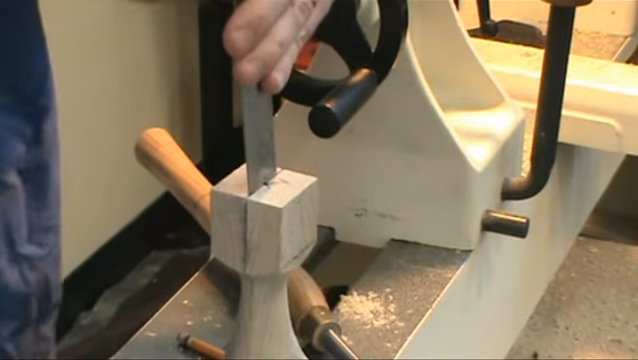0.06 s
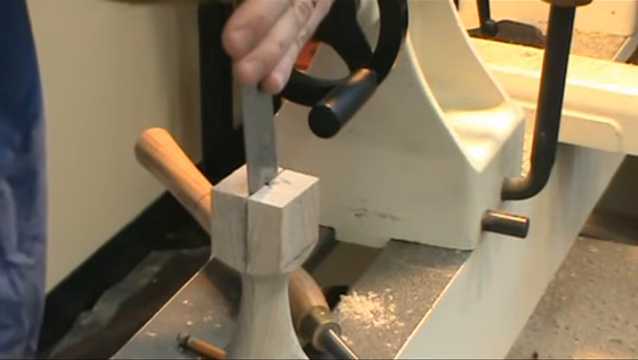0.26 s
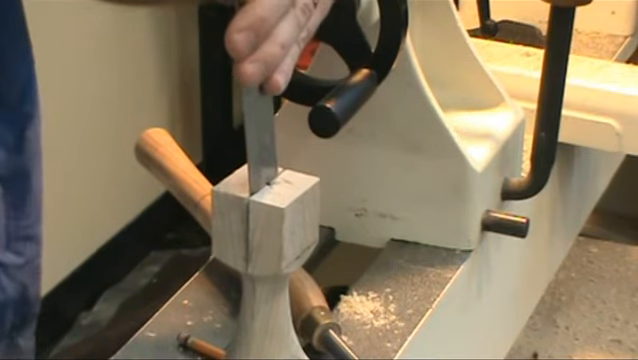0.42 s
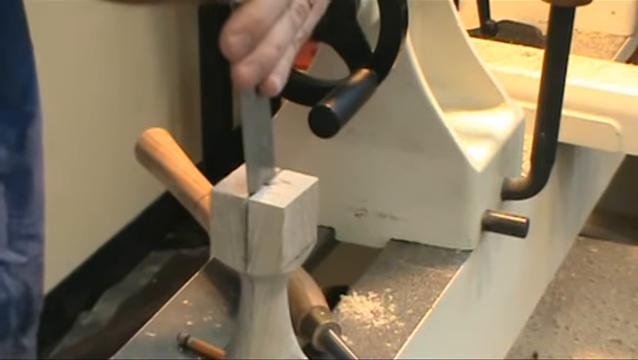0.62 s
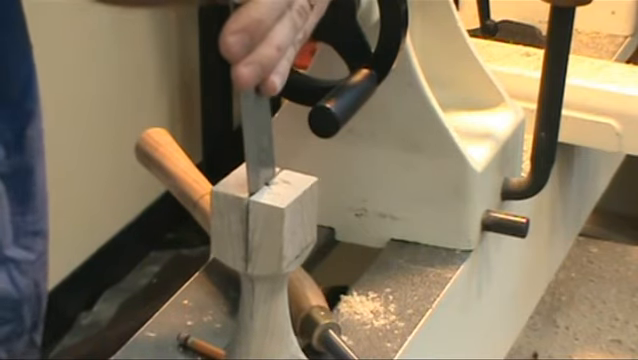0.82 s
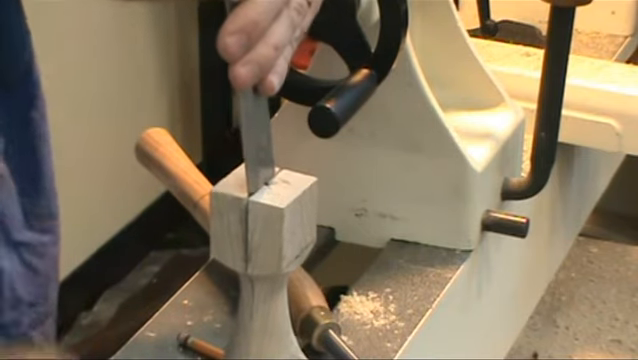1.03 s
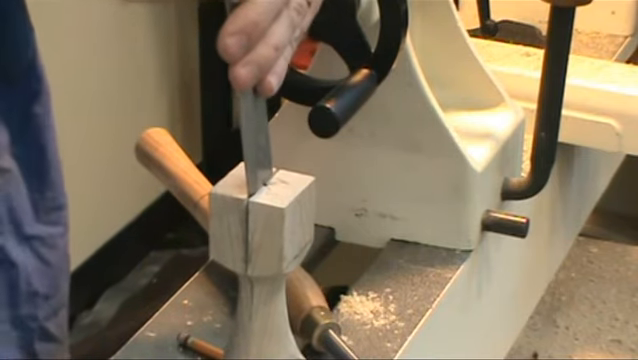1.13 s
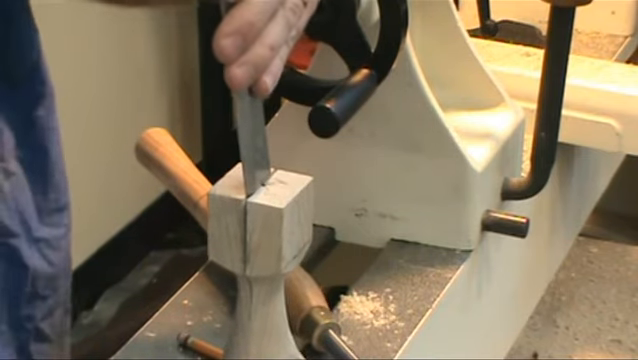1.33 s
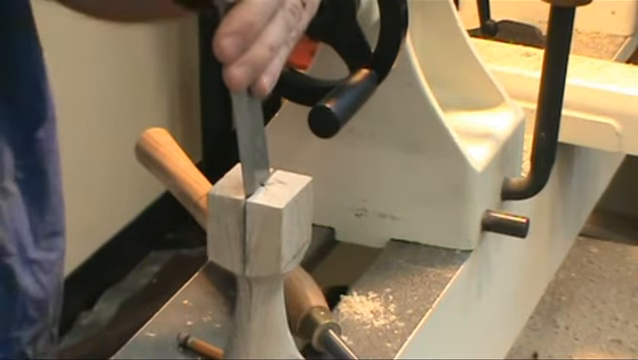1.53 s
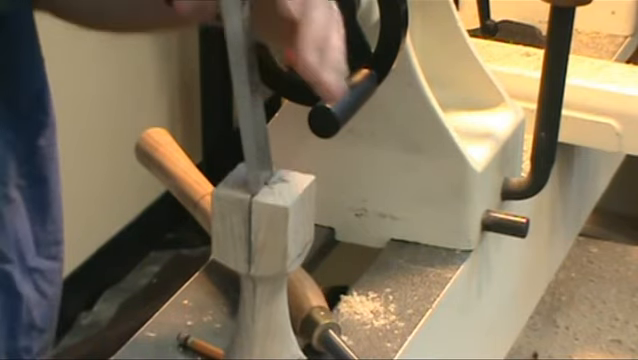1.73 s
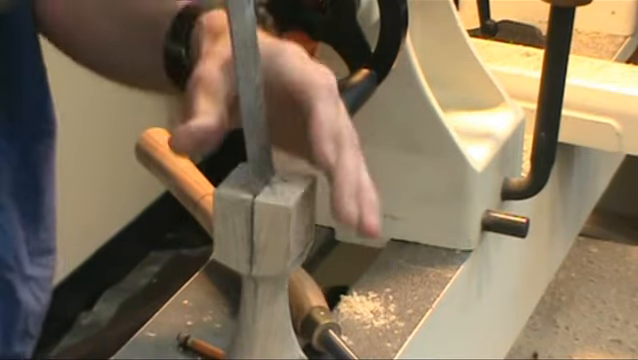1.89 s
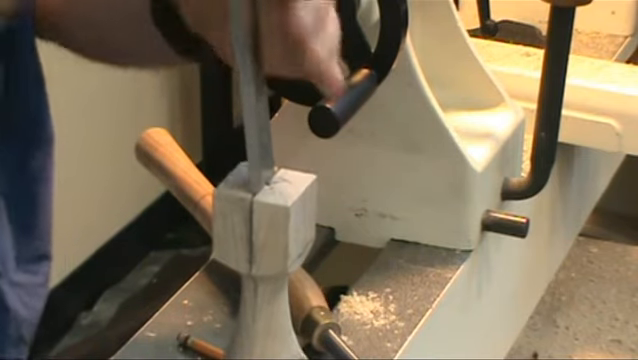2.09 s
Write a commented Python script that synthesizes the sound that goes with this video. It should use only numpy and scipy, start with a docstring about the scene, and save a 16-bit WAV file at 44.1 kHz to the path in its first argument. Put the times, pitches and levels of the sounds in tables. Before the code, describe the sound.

Three sharp wooden knocks on a chisel ring through a large, hard, echoing workshop

```python
"""Room rumble, hum, hiss and a thin high whine run throughout a large hard workshop, with the fading tail of an
earlier sound at first. A chisel standing in a glued wooden block on a steel lathe bed then takes three quick blows:
each is a noise crack, a dead thunk and damped modes of block and bed, followed by a wall's slap and the hall's tail.
Afterwards a tool is put down (damped partials), a sleeve rustles (noise puffs) and something squeaks faintly
(gliding tones); automatic gain control lowers the loud moments and recovers slowly."""
import sys
import numpy as np
from scipy import signal
from scipy.fft import rfft, irfft, next_fast_len
from scipy.io import wavfile
from scipy.ndimage import uniform_filter1d

SR = 44100
rng = np.random.default_rng(int(sys.argv[2]) if len(sys.argv) > 2 else 0)


def nominal_scale(level):
    """Amplitude ratio for a level in decibels (scalar or array-like)."""
    x = np.asarray(level, float) / 20
    return 10 ** x


def transcribe(u):
    """Save the signal u as a 16-bit wav file named by the first command-line argument.

    u: samples, shape (n,) or (channels, n), limited to [-1, 1]; the rate is SR.
    q: integer samples, one column per channel.
    """
    v = np.clip(np.atleast_2d(u).T, -1, 1)
    q = np.round(v * 32767).astype(np.int16)
    wavfile.write(sys.argv[1], SR, q)


N = 94815  # samples in the scene
HALF_SECOND = np.arange(SR // 2) / SR  # time axis of one short sound, s


def unit(x):
    """Normalisation: scales a signal to rms 1."""
    return x / np.sqrt(np.mean(x ** 2) + 1e-20)


def along(points, hz):
    """Logarithmic frequency scale: interpolates (Hz, value) points."""
    f, v = np.transpose(points)
    return np.interp(np.log(hz + 1), np.log(f + 1), v)


def bell(f, hz, octaves):
    """Constant relative bandwidth: a Gaussian hump on a log frequency axis."""
    return np.exp(-.5 * (np.log2((f + 1) / hz) / octaves) ** 2)


def coloured(shape, gain):
    """Spectral shaping: white noise weighted by gain(f), then scaled to rms 1."""
    m = next_fast_len(shape[-1])
    spectrum = rfft(rng.standard_normal(shape), m) * gain(np.fft.rfftfreq(m, 1 / SR))
    return unit(irfft(spectrum, m)[..., :shape[-1]])


def phase_walk(shape, width_hz):
    """Phase diffusion: a random walk in phase widens a spectral line to width_hz."""
    return np.cumsum(rng.standard_normal(shape), axis=-1) * np.sqrt(2 * np.pi * width_hz / SR)


def spread(pair, alike):
    """Interaural coherence: mid and side from two unrelated signals give the likeness per frequency."""
    n = pair.shape[-1]
    angle = np.arccos(np.clip(along(alike, np.fft.rfftfreq(n, 1 / SR)), 0, 1)) / 2
    mid, side = irfft(rfft(pair) * [np.cos(angle), np.sin(angle)], n)
    return np.array([mid + side, mid - side])


def add(track, s, x):
    """Superposition: mixes x into track from time s."""
    part = track[..., round(s * SR):][..., :x.shape[-1]]
    part += x[..., :part.shape[-1]]


# spectrum of the crack at the second blow: frequency_hz, relative_db
CRACK = [(300, -38), (1000, -16.5), (2500, -0.5), (5000, -4.5), (7000, -7), (9800, -5), (12500, -10.5),
         (15500, -42), (17000, -64)]
BRIGHTENS_DB = 1.5  # treble tilt per blow, nearing this much per octave above 5 kHz: the chisel bites harder


def bite(f, k):
    """Impact spectrum: a harder contact is shorter and so brighter; gives dB at f for blow k."""
    return along(CRACK, f) + BRIGHTENS_DB * (k - 1) * np.log2(1 + f / 5000)


def crack(k, crack_db):
    """Impact noise: a broadband burst, held briefly, then decaying exponentially."""
    t, hold_s, t60_s, rise_s = HALF_SECOND, 0.0019, 0.015, 0.0013
    burst = coloured(t.shape, lambda f: nominal_scale(bite(f, k)))
    decay = nominal_scale(crack_db - 5 - 60 * np.maximum(t - hold_s, 0) / t60_s)
    return burst * decay * np.minimum(t / rise_s, 1)


# spectrum of dead wood: frequency_hz, relative_db
THUNK = [(80, -45), (200, -19.5), (450, -4.5), (750, -8), (1500, -1.5), (2200, -10), (3000, -7),
         (4500, -16), (9000, -31), (15000, -56)]


def thunk(ring_colour, mean_db):
    """High damping: dead wood answers with a noise burst that has no clear pitch."""
    t, level_db, t60_s, rise_s = HALF_SECOND, -14.5, .12, 0.00075
    burst = coloured(t.shape, lambda f: nominal_scale(along(THUNK, f) + along(ring_colour, f) - mean_db))
    return burst * nominal_scale(level_db - 60 * t / t60_s) * (1 - np.exp(-t / rise_s))


# modes of block and steel bed: frequency_hz, relative_db at the second blow,
# gained_db per blow as the chisel sinks, t60_s
BED = [(300, -10, 2, .15), (453, -3.5, -1, 0.24), (478.4, -1.5, -1.5, 0.25), (579.3, -10.5, -2, 0.24),
       (782, -1.5, 6.5, 0.039), (918, 2, 0, 0.081), (1070, -7.5, -10, 0.049), (1270, -0.5, 2.5, .14),
       (1369, 0.5, 3, 0.14), (1511, -12, 5, 0.086), (1621, -2.5, -4.5, 0.15), (1692, -4.5, 9, .08),
       (1758.4, 3, 2, 0.18), (1938, -6, 7.5, 0.11), (2125, -3, -0.5, 0.21), (2370, -8, -5.5, 0.16),
       (2658, -1.5, -1.5, 0.15), (2814, 0, -3, 0.24), (2853, -2, 1, 0.31), (2927, 3, 0.5, 0.16),
       (3105, -0.5, 6.5, 0.12), (3204, -5, 8.5, 0.12), (3340, -10.5, 9, 0.22), (3780, -17, 6, .1),
       (4340, -13.5, -7, 0.078)]
WAVER_HZ = 9  # line width that the loose, glued joint adds to each mode
RISE_CYCLES = 2.66  # time constant of a mode's build-up, in its own cycles


def modes(k, ring_colour):
    """Modal superposition: damped sinusoids, each with its own level, decay and wandering phase."""
    t = HALF_SECOND
    hz, level_db, gained_db, t60 = np.transpose(BED)[..., None]
    waver = phase_walk((len(BED), len(t)), WAVER_HZ)
    tones = np.sin(2 * np.pi * (hz * t + rng.random(hz.shape)) + waver)
    start_db = level_db + gained_db * (k - 1) + along(ring_colour, hz)
    build_up = 1 - np.exp(-t * hz / RISE_CYCLES)
    return np.sum(nominal_scale(start_db - 60 * t / t60) * tones * build_up, axis=0)


# colour of the crack on its way off the wall and round the hall: frequency_hz, gain_db
HALL_COLOUR = [(200, -7), (1000, 6.5), (3500, -2.5), (5500, -7), (8000, -5.5), (12000, -11), (15500, -2)]


def slap(k, crack_db, ring):
    """Specular reflection: the far wall returns the ring and a crack smeared in time."""
    t, smear_db, ring_gain_db, rise_s, t60_s = HALF_SECOND, -6, -3.5, 0.0012, 0.022
    smear = coloured(t.shape, lambda f: nominal_scale(bite(f, k) + along(HALL_COLOUR, f)))
    smear = smear * nominal_scale(crack_db + smear_db - 60 * t / t60_s) * (1 - np.exp(-t / rise_s))
    return smear + nominal_scale(ring_gain_db) * ring


def hall_click(k, direct):
    """Energy equivalence: a smooth-spectrum click with the crack's energy, then coloured by the hall."""
    f = np.fft.rfftfreq(512, 1 / SR)
    click = np.roll(irfft(nominal_scale(bite(f, k))), 64)
    click = click * np.linalg.norm(direct) / np.linalg.norm(click)
    return irfft(rfft(click) * nominal_scale(along(HALL_COLOUR, f)))


# frequencies of the four ring columns below: frequency_hz
RING_AT_HZ = [500, 1300, 1700, 2900]
# blows: start_s, crack_db (before a 5 dB cut in the direct crack),
# ring_500hz_db, ring_1300hz_db, ring_1700hz_db, ring_2900hz_db
BLOWS = [(0.2392, -11, -23, -23, -23, -24.5), (0.4682, -4, -19, -20.5, -16.5, -25),
         (0.6873, -3.5, -20, -20.5, -18.5, -28.5)]
SLAP_S = .0345  # delay of the far wall's echo
HALL_DB, SLAP_HALL_DB = -2, -3.5  # hall sound started by the blow and by the wall's echo
PAN_DB = 1.24  # left raised and right lowered by this much


def blows():
    """Impulse excitation: direct sound first, then the wall's reflection and the reverberation."""
    out = np.zeros((2, N))
    for k, (s, crack_db, *ring_db) in enumerate(BLOWS):
        ring_colour = list(zip(RING_AT_HZ, ring_db))
        direct = crack(k, crack_db)
        ring = thunk(ring_colour, np.mean(ring_db)) + modes(k, ring_colour)
        add(out, s, (direct + ring) * nominal_scale([[PAN_DB], [-PAN_DB]]))
        click = hall_click(k, direct)
        into_hall = np.pad(click, (0, len(ring) - len(click))) + ring
        add(out, s, nominal_scale(HALL_DB) * hall(into_hall))
        add(out, s + SLAP_S, slap(k, crack_db, ring))
        add(out, s + SLAP_S, nominal_scale(SLAP_HALL_DB) * hall(click))
    return out


# reverberation time: frequency_hz, t60_s
HALL = [(100, 0.89), (300, 1.35), (700, 1.22), (1800, 0.87), (4000, 0.92), (8000, 0.46), (14000, .4)]
# left-right likeness of the tail: frequency_hz, likeness (0 to 1)
HALL_ALIKE = [(60, 1), (300, 0.71), (800, 0.85), (1500, 0.57), (4000, 0.41), (10000, 0.25)]


def hall(x):
    """Diffuse-field reverberation: convolution with noise whose frequencies die at their own speeds."""
    rise_s = 0.0074
    hz, t, z = signal.stft(rng.standard_normal((2, 3 * SR // 2)), SR, nperseg=256)
    decay = nominal_scale(-60 * t / along(HALL, hz)[:, None])
    tail = signal.istft(z * decay, SR, nperseg=256)[1]
    build_up = 1 - np.exp(-np.arange(tail.shape[1]) / SR / rise_s)
    tail = spread(tail * build_up, HALL_ALIKE)
    return signal.fftconvolve(x[None], tail / np.linalg.norm(tail[0]), axes=1)


# soft bumps on the bench: start_s, level_db, pitch_hz, t60_s
BUMPS = [(1.2205, -26, 237, 0.032), (1.303, -33, 148.5, 0.071), (1.378, -32.5, 387, 0.038),
         (1.595, -38.5, 109, 0.066), (1.945, -41.5, 85, 0.15)]


def bumps():
    """Damped resonance: one push starts three partials, the higher ones dying sooner."""
    out, t = np.zeros(N), np.arange(SR // 4) / SR
    for s, db, hz, t60 in BUMPS:
        for ratio, partial_db in [(.62, -1.5), (1, 2), (1.75, -6.5)]:
            decay = nominal_scale(db + partial_db - 60 * t * ratio / t60)
            add(out, s, -decay * np.sin(2 * np.pi * hz * ratio * t))
    return out


def puffs(rows, gain):
    """Shaped noise: grainy puffs swell to each row's time and die; gain(f, centre) colours them."""
    out, t, rough_db = np.zeros(N), HALF_SECOND, 2.5
    for s, db, rise, t60, hz in rows:
        grain = nominal_scale(rough_db * unit(uniform_filter1d(rng.standard_normal(len(t)), size=50)))
        late = t - 3 * rise  # time after the peak
        shape = nominal_scale(db - 60 * np.maximum(late, 0) / t60) * np.exp(np.minimum(late, 0) / rise)
        noise = unit(coloured(t.shape, lambda f: gain(f, hz)) * grain)
        add(out, max(s - 3 * rise, 0), noise * shape)
    return out


# dull scuffs and taps on the bench; the first two rows are an earlier sound dying away:
# peak_s, level_db, rise_s, t60_s, centre_hz
DULL_PUFFS = [(.012, -45.5, .002, 0.54, 454), (.014, -54, .002, .8, 1510), (1.05, -38.5, 0.016, 0.31, 237),
              (1.113, -37.5, 0.0027, 0.073, 3330), (1.22, -35, .001, 0.04, 1800),
              (1.23, -36.5, .004, 0.43, 300), (1.306, -41.5, 0.0021, 0.055, 1570),
              (1.381, -43.5, .003, 0.056, 980), (1.411, -36, .003, 0.031, 1790),
              (1.415, -35.5, .002, 0.042, 840), (1.465, -46.5, .003, 0.087, 3040)]


def dull_puffs():
    """Band-limited noise: a single hump about each centre frequency."""
    octaves = 0.65
    return puffs(DULL_PUFFS, lambda f, hz: bell(f, hz, octaves))


# sleeve and shavings: peak_s, level_db, rise_s, t60_s, centre_hz
RUSTLES = [(1.217, -38.5, 0.0016, 0.029, 10300), (1.304, -45.5, .003, 0.022, 11250),
           (1.36, -47, 0.03, 0.22, 11350), (1.408, -34, 0.011, 0.055, 11400),
           (1.428, -52, 0.0026, 0.025, 11000), (1.4575, -33, .0007, .05, 9700),
           (1.491, -56, .02, 0.083, 10100), (1.51, -36.5, 0.0066, .05, 10430),
           (1.587, -47.5, 0.0025, 0.11, 11000), (1.643, -49, .008, 0.15, 10800)]


def rustles():
    """Broadband friction noise: a bright hump over a weaker broad skirt, cut at 16 kHz."""
    octaves, skirt_db = 0.36, -6

    def sleeve(f, hz):
        """High-pass skirt: adds a gentle slope to the resonant hump."""
        skirt = nominal_scale(skirt_db) * f / (f + 1500)
        return (bell(f, hz, octaves) + skirt) * (f < 16000)

    return puffs(RUSTLES, sleeve)


# squeaks: start_s, length_s, from_hz, to_hz, level_db (before a 2 dB rise)
SQUEAKS = [(1.951, 0.037, 8440, 9000, -59), (1.983, 0.083, 2970, 2873, -58)]


def squeaks():
    """Frequency modulation: the phase integrates a gliding pitch and also wanders."""
    out, waver_hz = np.zeros(N), 30
    for s, length, from_hz, to_hz, db in SQUEAKS:
        u = np.arange(round(length * SR)) / (length * SR)
        cycles = np.cumsum(from_hz + (to_hz - from_hz) * u) / SR
        tone = np.sin(2 * np.pi * cycles + phase_walk(len(u), waver_hz))
        add(out, s, nominal_scale(db + 2) * np.sqrt(np.sin(np.pi * u)) * tone)
    return out


# port phase, left ahead of right: frequency_hz, lead_rad
LEFT_LEADS = [(0, 0.7), (780, -0.73), (5170, -0.13), (10800, 0.3), (11000, 0.4), (11800, -0.0),
              (16400, -0.0)]


def ports(x):
    """Interchannel phase: two microphone ports hear the bench from one side; each takes half the lead."""
    lead = np.exp(.5j * along(LEFT_LEADS, np.fft.rfftfreq(N, 1 / SR)))
    return irfft(rfft(x) * [lead, lead.conj()], N)


def level_at(points):
    """Envelope: amplitude over the scene from (s, dB) points."""
    return nominal_scale(np.interp(np.arange(N) / SR, *np.transpose(points)))


# rumble that comes and goes: time_s, level_db
RUMBLE_LEVEL = [(0.0, -40.5), (0.14, -48), (0.66, -37.5), (1.14, -44.5), (1.28, -48), (1.78, -50),
                (2.15, -49.5)]
# its spectrum: frequency_hz, relative_db (per Hz)
RUMBLE = [(30, -37), (60, -12), (95, -3.5), (160, -7), (350, -10), (480, -13), (700, -17.5), (1500, -38.5)]
# its left-right likeness: frequency_hz, likeness (0 to 1)
RUMBLE_ALIKE = [(30, 0.85), (120, 0.97), (500, 0.83)]


def rumble():
    """Long-wavelength coherence: low noise reaches both sides nearly alike."""
    noise = coloured((2, N), lambda f: nominal_scale(along(RUMBLE, f)))
    return level_at(RUMBLE_LEVEL) * spread(noise, RUMBLE_ALIKE)


# low wavering hum that swells and fades: time_s, level_db
HUM_LEVEL = [(0.0, -51), (0.13, -50), (0.24, -54.5), (0.28, -41), (0.86, -48), (0.87, -41.5), (1.81, -52.5),
             (2.02, -52.5), (2.15, -69)]


def hum():
    """Narrow-band noise: a slim Gaussian band beats with itself and so wavers."""
    centre_hz, width_hz = 121.9, 14.8
    return level_at(HUM_LEVEL) * coloured((N,), lambda f: np.exp(-.5 * ((f - centre_hz) / width_hz) ** 2))


# steady building rumble: frequency_hz, relative_db (per Hz)
DEEP = [(12, -25), (30, 0), (55, -5), (90, -7), (150, -42.5)]


def deep_rumble():
    """Stationary noise: steady building rumble, the same on both sides."""
    return nominal_scale(-48.5) * coloured((N,), lambda f: nominal_scale(along(DEEP, f)))


# hiss spectrum: frequency_hz, relative_db (per Hz)
HISS = [(290, -18), (500, -20.5), (834, -7.5), (924, -2.5), (1540, -3.5), (2570, -7), (8060, -16),
        (15300, -10.5), (16500, -24.5)]


def hiss():
    """Partial coherence: steady noise with the same left-right likeness at every frequency."""
    level_db, likeness = -55, 0.52
    noise = coloured((2, N), lambda f: nominal_scale(along(HISS, f)))
    return nominal_scale(level_db) * spread(noise, [(1000, likeness)])


def whine():
    """Pure tone: one steady sinusoid near the top of hearing."""
    hz, peak_db = 15734, -64
    return nominal_scale(peak_db) * np.sin(2 * np.pi * hz * np.arange(N) / SR)


def background():
    """Incoherent addition: unrelated noises and a tone sum to the room's floor."""
    return rumble() + hum() + deep_rumble() + hiss() + whine()


def scene():
    """Superposition at the microphone: blows, small sounds with their hall, and the background."""
    small_hall_db = -6
    small = bumps() + dull_puffs() + rustles() + squeaks()
    small_hall = nominal_scale(small_hall_db) * hall(small)[:, :N]
    return ports(blows() + small + small_hall) + background()


def top_cut(x):
    """Nothing passes above the cut-off."""
    return signal.sosfilt(signal.butter(12, 16800, fs=SR, output="sos"), x)


def record(dry):
    """Dynamic range compression: gain falls fast, recovers slowly, and a soft ceiling rounds peaks."""
    knee_db, squeeze = -16.5, 0.51  # squeeze: share of the excess taken away
    grab_s, let_go_s, ceiling = 0.0054, 0.26, .62
    power = np.abs(uniform_filter1d(np.mean(dry ** 2, axis=0), size=max(round(grab_s * SR), 1)))
    keep = np.exp(-1 / (let_go_s * SR))
    held = np.maximum(power, signal.lfilter([1 - keep], [1, -keep], power))
    excess_db = np.maximum(10 * np.log10(held + 1e-12) - knee_db, 0)
    levelled = dry * nominal_scale(-squeeze * excess_db)
    mix = levelled / (1 + np.abs(levelled / ceiling) ** 4) ** (1 / 4)
    return top_cut(mix)


dry = scene()
out = record(dry)
transcribe(out)
```